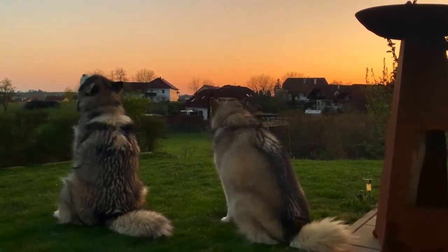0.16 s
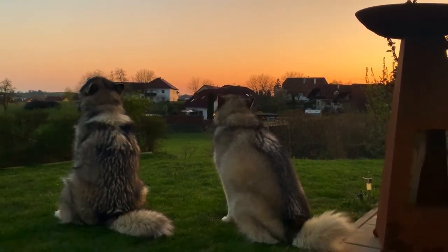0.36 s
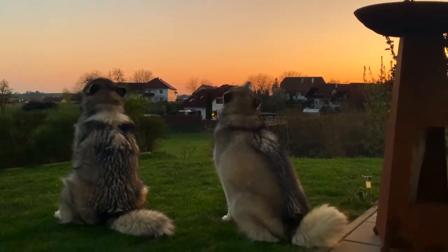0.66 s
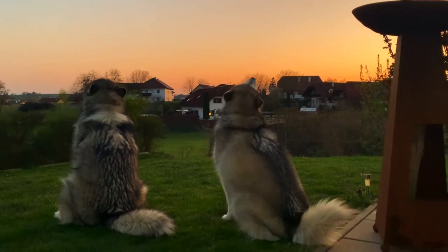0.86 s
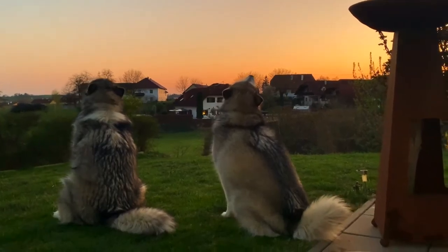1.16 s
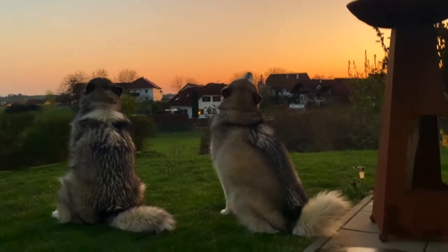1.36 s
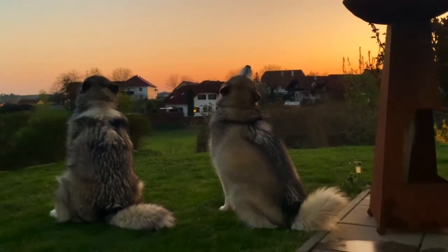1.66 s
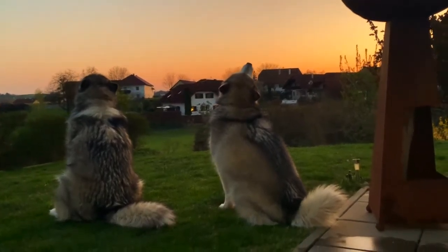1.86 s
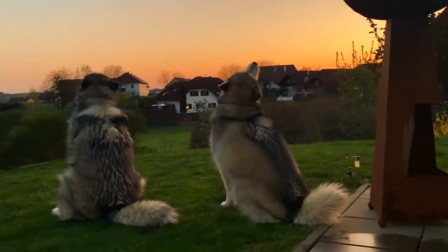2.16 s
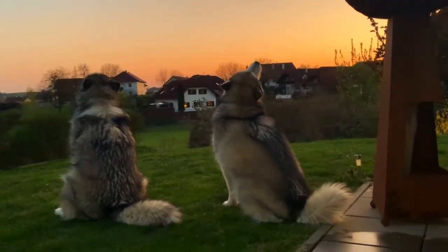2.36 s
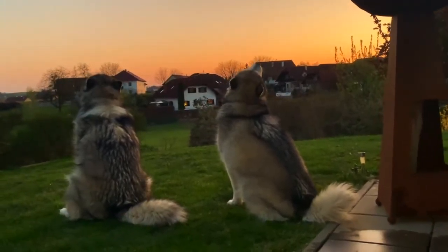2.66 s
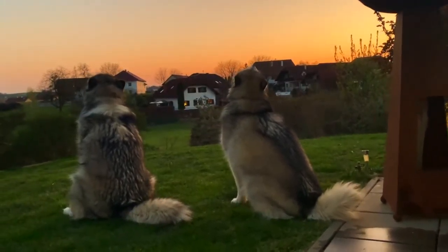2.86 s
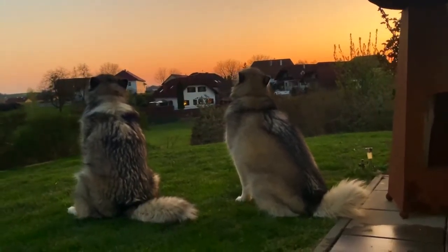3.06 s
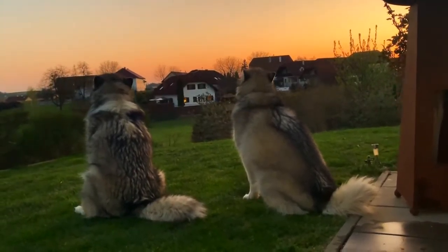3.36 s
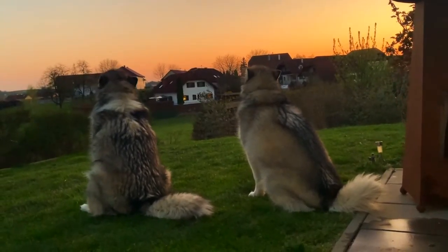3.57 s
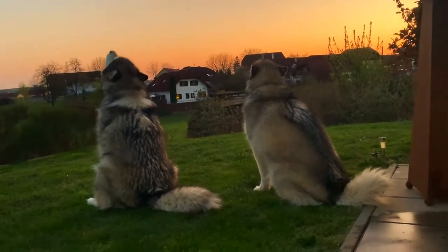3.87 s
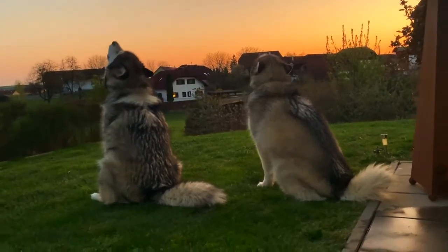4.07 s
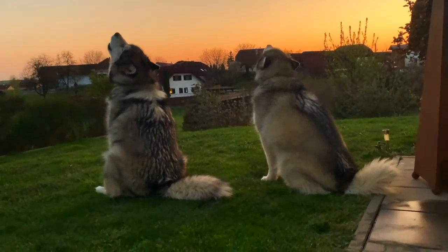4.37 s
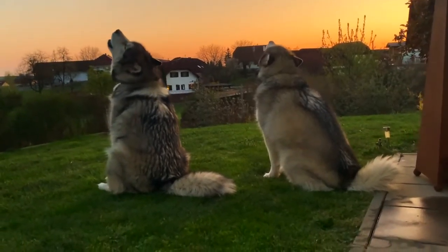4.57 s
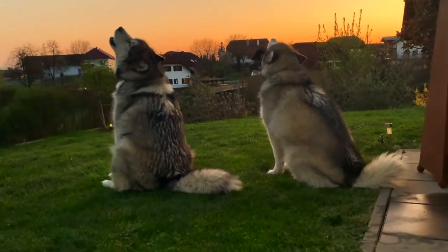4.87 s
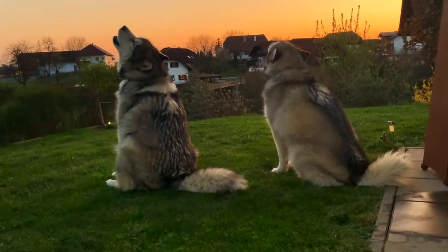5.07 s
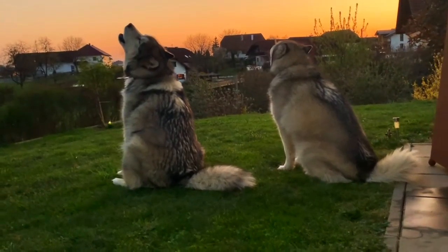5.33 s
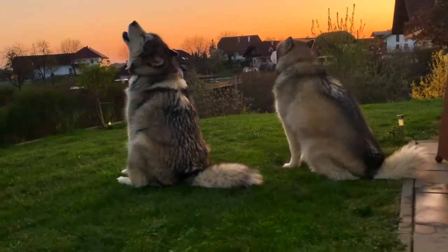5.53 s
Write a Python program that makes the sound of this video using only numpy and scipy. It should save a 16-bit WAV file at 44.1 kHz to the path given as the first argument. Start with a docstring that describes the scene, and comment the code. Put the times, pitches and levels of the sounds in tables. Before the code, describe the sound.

Two large dogs howl together in an open garden, one low and one high, their long sliding calls overlapping and clashing in pitch.

```python
"""Two large dogs howl together in an evening garden, a few metres from a hand-held phone.
The low dog opens with a moan that breaks in pitch, under a thin whistle; the high dog joins with one long slide.
Rustles brush past close by; the low dog howls again from a rough yelp, a soft thud falls, more rustles follow.
Howls are harmonic stacks shaped by mouth and throat, with hoarse flutter and breath noise.
Noise-tail echoes of walls and hedges, a distant noise hum and faint wavering tones lie under it throughout."""
import sys
import numpy as np
from scipy import signal
from scipy.fft import rfft, irfft
from scipy.io import wavfile
from scipy.ndimage import uniform_filter1d

SR = 44100
rng = np.random.default_rng(int(sys.argv[2]) if len(sys.argv) > 2 else 0)


def master(y):
    """Save y as 16-bit WAV."""
    cut = np.clip(np.atleast_2d(y).T, -1, 1)
    pcm = np.round(cut * 32767)  # scale
    wavfile.write(sys.argv[1], SR, pcm.astype(np.int16))


N = 251370
T = np.arange(N) / SR  # s
SIDES = np.array([[1], [-1]])  # left, right

# low dog's howls: start_s, pitch_hz, level_db, mouth_db (second harmonic over fundamental)
LOW_FIRST_HOWL = [(0, 286.4, -25, 8.5), (.09, 277.5, -23.5, 13), (.27, 288.5, -24.5, 10),
                  (.335, 329.9, -17.5, 9.5), (.375, 408, -20, -3), (.47, 443, -22, -10.5),
                  (.52, 340.3, -27, 19), (.62, 370, -15.5, 21), (1.03, 383.7, -18.5, 10.5),
                  (1.29, 379.9, -21.5, 9), (1.45, 388.9, -22, 9), (1.68, 391.7, -22.5, 8.5),
                  (1.98, 404, -26.5, 12), (2.05, 429, -26, 12.5), (2.075, 523.3, -32, 1),
                  (2.25, 518, -30.5, 8.5), (2.47, 488, -33.5, 9.5), (2.58, 485, -40, 7.5)]
LOW_SECOND_HOWL = [(3.47, 242.4, -43.5, -0.5), (3.5, 278.1, -32.5, 4.5), (3.52, 315.7, -25, 2.5),
                   (3.538, 369.6, -13.5, 7), (3.57, 375.3, -9.5, 5), (3.59, 422.7, -16.5, -7),
                   (3.65, 413.3, -23.5, -7.5), (3.672, 368, -18.5, -14.5), (3.692, 356, -14.5, -20.5),
                   (3.74, 348.6, -20, -16), (3.82, 355.3, -16.5, -13.5), (3.925, 355.5, -15.5, -14),
                   (3.96, 386.7, -24.5, 5.5), (4.1, 381.8, -24, 17), (4.43, 380.4, -27, 14.5),
                   (4.55, 372, -23, 6.5), (4.73, 359.9, -22, -5), (5.05, 358.8, -18.5, -5),
                   (5.7, 356.1, -24, -3.5)]
# high dog's howl: start_s, pitch_hz, level_db
HIGH_LONG_HOWL = [(.125, 559, -28), (.16, 563, -32.5), (.205, 722, -18.5), (.35, 701, -8),
                  (.455, 719, -14.5), (.7, 642, -25), (.9, 552, -23), (.96, 497, -24), (1.1, 482, -20),
                  (1.3, 471, -25), (1.5, 498, -22), (1.68, 478, -20.5), (1.92, 475, -21), (2.1, 457, -24),
                  (2.28, 443, -26), (2.55, 430, -15.5), (2.605, 403, -17.5), (2.76, 397, -14.5),
                  (2.92, 403, -16), (2.98, 383.2, -17.5), (3.08, 370, -25), (3.19, 367, -29),
                  (3.335, 369, -26.5), (3.395, 385, -17.5), (3.46, 396, -18), (3.59, 394, -17),
                  (3.68, 419, -18), (3.74, 478, -22.5), (3.8, 507, -15), (3.87, 578, -10.5),
                  (3.93, 602, -9), (4.05, 636, -10.5), (4.2, 591, -10), (4.26, 575, -11.5),
                  (4.37, 567, -13), (4.46, 595, -15), (4.56, 639, -13.5), (4.68, 645, -16),
                  (4.78, 632, -14.5), (4.96, 531, -19), (5.04, 483, -37), (5.125, 472, -24.5),
                  (5.2, 405, -31), (5.32, 378, -33)]
# high dog's mouth, set by pitch: pitch_hz, mouth_db (second harmonic over fundamental)
HIGH_MOUTH_BY_PITCH = [(368, 1), (384, -5.5), (398, -11), (435, -11.5), (452, 13.5), (475, -4.5), (494, 12),
                       (515, -22.5), (555, -12), (575, -23), (635, -21.5), (705, -44)]
# throat colour of the upper overtones and breath: freq_hz, gain_db (relative)
LOW_THROAT_COLOUR = [(1100, 22.5), (1550, -3.5), (1900, -2), (2250, -38.5), (2850, -9.5), (3300, -39),
                     (3800, -35), (4300, -46), (4800, -32), (5500, -46), (9000, -57.5)]
HIGH_THROAT_COLOUR = [(1550, -10.5), (1950, 6.5), (2450, -9), (3000, -9.5), (3500, -20.5), (4100, -26.5),
                      (4700, -43.5), (5300, -35.5), (6000, -16.5), (6500, -9.5), (7000, -35.5),
                      (11500, -57)]
# brightness: start_s, third_db and upper_db (against howl level), press_db (lift above about 2.5 kHz)
LOW_BRIGHTNESS = [(0, -15.5, -16, 3.5), (0.301, -18.5, -20, 6), (.43, -10.5, -31.5, -2),
                  (.52, -31.5, -21.5, -8), (0.701, -27.5, -22, -7.5), (1.3, -24, -29.5, -14.5),
                  (2.001, -24.5, -27.5, -2.5), (2.15, -32, -34.5, -0.5), (2.55, -26.5, -33, -3.5),
                  (3.495, 11, 5.5, -19), (3.525, -5, -10, -20), (3.55, -18.5, -16, -15.5),
                  (3.62, -11.5, -16, -18), (3.69, -38.5, -39, 0.5), (4.1, -34.5, -43.5, 6),
                  (4.802, -49.5, -45, 8.5), (5.3, -45.5, -41.5, 11.5), (5.7, -43, -31.5, 15)]
HIGH_BRIGHTNESS = [(.15, -55, -34, -8), (0.352, -47, -56.5, -6), (.7, -33.5, -50.5, 23),
                   (.97, -39.5, -35.5, 8.5), (1.201, -47, -39, 7), (1.599, -33, -32, -0.5),
                   (2.1, -31.5, -33.5, 7), (2.48, -41.5, -39.5, 4), (2.58, -25, -24.5, -6),
                   (2.701, -19.5, -33.5, -7.5), (3.251, -9, -25, -9), (3.42, -12.5, -30.5, -3),
                   (3.75, -26.5, -30.5, -5.5), (3.929, -19, -39, -14.5), (4.09, -15, -27.5, -20),
                   (4.299, -19, -44.5, -11.5), (4.55, -12.5, -27, -17), (4.72, -26.5, -38.5, -15.5),
                   (4.93, -9.5, -32, -12.5), (5.04, -16.5, -8.5, -10.5), (5.13, -19.5, -19, -13),
                   (5.32, -36.5, -26.5, -15.5)]
# place as the phone moves: start_s, fundamental_pan_db, second_pan_db (left minus right)
LOW_PLACE = [(0, 0.5, 1), (0.648, 11, 4), (1.2, -2.5, 5), (2.3, -15, 2), (3.551, 2.5, 9), (3.8, 8.5, 13),
             (4.101, -17.5, 1), (4.801, -1, 10), (5.199, -3.5, 9), (5.7, -18.5, 6)]
HIGH_PLACE = [(.3, -6, -1.5), (0.999, 3, 3), (2.002, 11, 0), (2.35, -15, 3.5), (2.619, 3, -2.5),
              (2.999, 0.5, 5.5), (3.25, -7.5, 12.5), (3.45, 0.5, 5), (3.801, 6.5, -0.5), (4.9, 4.5, -0.5),
              (5.4, -2.5, 2.5)]
# thin whistle in the opening moan: start_s, freq_hz, level_db (sine peak)
MOAN_WHISTLE = [(0, 5010, -64), (.08, 4640, -79.5), (.27, 4980, -70.5), (.6, 4830, -110)]
# rustles: start_s, length_s, level_db (before swell), treble_slope (1.68 dB per octave each)
RUSTLE_EVENTS = [(2.211, 0.071, -56.5, -6), (2.392, 0.061, -53, -11), (2.42, 0.098, -51, -15.5),
                 (4.972, 0.02, -57.5, -10), (5.002, 0.042, -53.5, -2.5), (5.039, 0.21, -67.5, -10.5),
                 (5.249, 0.024, -52, -19)]
# village hum spectrum: freq_hz, gain_db (per Hz, relative)
VILLAGE_SPECTRUM = [(20, -32.5), (45, -6.5), (75, -3), (130, -4), (220, -3.5), (320, -0.5), (550, -9),
                    (1000, -14.5), (2000, -30), (3500, -42), (6000, -40.5), (8000, -47.5), (15000, -51.5)]
# far-off engine drone: start_s, freq_hz, level_db (sine peak)
ENGINE_DRONE = [(1, 130.9, -63.5), (1.4, 133.2, -49), (2.3, 128, -52), (2.7, 176.1, -50.5),
                (4.3, 173.3, -50.5), (4.7, 156, -54.5)]
# faint tone from further away: start_s, freq_hz, level_db (sine peak)
DISTANT_TONE = [(.7, 319, -43), (2.6, 325.7, -45.5), (3.1, 314, -63.5)]

# roughness: per octave/s of glide; at the start, with its decay; level at which fading adds 0 dB of it
GLIDE_ROUGH_DB, CATCH_ROUGH_DB, CATCH_S, FALTER_DB = -38, -15.5, 0.051, -58.5
START_MOUTH_DB, ROUNDING_S = 1, 0.1  # high dog starts wide, then rounds its mouth
THUD_S, THUD_HZ, THUD_DB, THUD_DECAY_S = 3.668, 94, -27.5, 0.02
VILLAGE_DB = -48.5
TOP_HZ = 15600


def low_dog():
    """Two howls with breaks in pitch, where the folds turn rough; a thin whistle rides on the first."""
    first = howl(LOW_FIRST_HOWL, curves(LOW_FIRST_HOWL)[2], LOW_BRIGHTNESS, LOW_PLACE, LOW_THROAT_COLOUR,
                 held_rough_db=-45.5, lead_ms=0.16, jitter_ratio=0.003, air_db=3.5, fade_s=0.0067)
    second = howl(LOW_SECOND_HOWL, curves(LOW_SECOND_HOWL)[2], LOW_BRIGHTNESS, LOW_PLACE, LOW_THROAT_COLOUR,
                  held_rough_db=-44, lead_ms=-0.19, jitter_ratio=0.0041, air_db=0, fade_s=0.019)
    return first + second + drone(MOAN_WHISTLE, waver_ratio=.002)


def high_dog():
    """One sliding howl; the mouth starts wide, then its opening follows the pitch."""
    pitch_hz = curves(HIGH_LONG_HOWL)[0]
    by_pitch_db = 20 * np.log10(colour(pitch_hz, HIGH_MOUTH_BY_PITCH))
    wide = np.exp(-((T - HIGH_LONG_HOWL[0][0]) / ROUNDING_S) ** 2)
    mouth_db = wide * START_MOUTH_DB + (1 - wide) * by_pitch_db
    return howl(HIGH_LONG_HOWL, mouth_db, HIGH_BRIGHTNESS, HIGH_PLACE, HIGH_THROAT_COLOUR,
                held_rough_db=-46, lead_ms=-0.069, jitter_ratio=.002, air_db=-10.5, fade_s=0.049)


def howl(rows, mouth_db, brightness, place, throat, held_rough_db, lead_ms, jitter_ratio, air_db, fade_s):
    """Folds ring in a harmonic stack; the mouth balances the lowest two, the throat shapes the overtones."""
    pitch_hz, level_db = curves(rows)[:2]
    third_db, upper_db, press_db = curves(brightness)
    start_s, end_s = rows[0][0], rows[-1][0]
    rough = hoarseness(pitch_hz, level_db, start_s, held_rough_db)

    # slight pitch waver; when hoarse, cycles differ in length and strength
    wavering_hz = pitch_hz * (1 + jitter_ratio * flutter(35))
    phase = 2 * np.pi * np.cumsum(wavering_hz) / SR + .45 * rough * flutter(130)
    fade_in = np.clip((T - start_s) / fade_s + .5, 0, 1)
    fade_out = np.clip((end_s - T) / fade_s + 1, 0, 1)
    strength = fade_in * fade_out * undb(level_db) * (1 + 0.63 * rough * flutter(130))

    # mouth: the lowest two share the howl level
    first = 1 / np.hypot(1, undb(mouth_db))
    second = first * undb(mouth_db)
    third = undb(third_db + 3.3 * flutter(4.9))
    low = [first, second, third]
    # throat: upper_db is the joint level of harmonics 4 to 6
    throat_power = sum(colour(k * pitch_hz, throat) ** 2 for k in (4, 5, 6))
    upper = undb(upper_db) / np.sqrt(throat_power)

    pans = [undb(SIDES / 2 * db) for db in curves(place)]
    # sound reaches the nearer microphone port first; positive lead_ms is left
    phase = phase + 2 * np.pi * pitch_hz * SIDES / 2 * lead_ms / 10 ** 3
    voice = np.zeros((2, N))
    for k in range(1, 21):
        if k <= 3:
            size = low[k - 1]
        else:
            press = undb(press_db * np.clip((k * pitch_hz - 2300) / 600, 0, 1))
            size = upper * colour(k * pitch_hz, throat) * press
            # short wavelengths fade in and out as the head moves above the reflecting ground
            size = size * undb(4.5 * flutter(13) - .7)
        pan = pans[k - 1] if k <= 2 else 1
        voice += np.sqrt(2) * size * np.sin(k * phase) * pan
    breath = undb(air_db) * rough * np.hypot(third, upper) * glottal_air(phase, throat)
    return strength * (voice + breath)


def hoarseness(pitch_hz, level_db, start_s, held_db):
    """Held notes are clean; folds turn rough at the start, at pitch breaks and as the voice fades."""
    glide_oct_per_s = uniform_filter1d(np.abs(np.gradient(np.log2(pitch_hz))) * SR, size=1300)
    catch = np.exp(-np.maximum(T - start_s, 0) / CATCH_S)
    falter = undb(FALTER_DB - level_db)
    return undb(held_db) + undb(GLIDE_ROUGH_DB) * glide_oct_per_s + undb(CATCH_ROUGH_DB) * catch + falter


def glottal_air(phase, throat):
    """Throat-coloured noise: air rushes through the glottis once a cycle."""
    def spectrum(f):
        band = f ** 2 / (f ** 2 + 600 ** 2) / (1 + (f / 2500) ** 4)
        return colour(f, throat) * band
    return noise(spectrum) * (1 + 0.23 * np.cos(phase))


def garden(x, wet_db, t60_s, dull_hz):
    """Walls and hedges scatter echoes: decaying, dulled noise tails, different at each port."""
    t = T[:SR]
    onset = np.clip((t - .006) / 0.0079, 0, 1)
    tail = rng.standard_normal((2, SR)) * undb(-60 * t / t60_s) * onset
    tail = tail / np.sqrt(np.sum(tail ** 2) / 2)
    tail = signal.sosfilt(signal.butter(1, dull_hz, fs=SR, output="sos"), tail)
    # each port echoes the other side
    return undb(wet_db) * signal.fftconvolve(x[::-1], tail, axes=1)[:, :N]


def rustles(low_hz, grain_db):
    """Cloth or grass brushes close by: short swells of grainy, wide noise."""
    out = np.zeros((2, N))
    for start_s, length_s, level_db, treble_slope in RUSTLE_EVENTS:
        u = np.clip((T - start_s) / length_s, 0, 1)
        swell = np.sqrt(u) * (1 - u) * 3.2 * undb(grain_db * flutter(200))

        def spectrum(f):
            slope = undb(treble_slope * np.log2(1 + f / low_hz) * 1.68)
            return slope * f ** 3 / (f ** 3 + low_hz ** 3)

        wide_noise = 0.7 * noise(spectrum) + 0.77 * noise(spectrum) * SIDES
        out += undb(level_db) * swell * wide_noise
    return out


def thud():
    """A soft, low bump: a sine and slow noise that die within a few cycles."""
    t = np.maximum(T - THUD_S, 0)
    body = np.sin(2 * np.pi * THUD_HZ * t) + .5 * flutter(155)
    return undb(THUD_DB) * body * (1 - np.exp(-t / 0.0032)) * np.exp(-t / THUD_DECAY_S)


def village(side_db):
    """A steady distant hum of shaped noise, with two faint drones in it."""
    mid, side = (noise(lambda f: colour(f, VILLAGE_SPECTRUM)) for _ in range(2))
    hum = undb(VILLAGE_DB) * (mid + undb(side_db) * side * SIDES)
    return hum + drone(ENGINE_DRONE, waver_ratio=0.0046) + drone(DISTANT_TONE, waver_ratio=.008)


def drone(rows, waver_ratio):
    """A faint sine that wavers in pitch and strength."""
    freq_hz, level_db = curves(rows)
    strength = undb(level_db + 2.7 * flutter(6))
    wavering_hz = freq_hz * (1 + waver_ratio * flutter(13))
    return strength * np.sin(2 * np.pi * np.cumsum(wavering_hz) / SR)


def undb(db):
    """Decibels to gain."""
    return 10 ** (np.asarray(db) / 20)


def unit(x):
    """Scale to an rms of one."""
    return x / np.sqrt(np.mean(x ** 2))


def curves(rows):
    """Table columns after the first, joined by straight lines in time."""
    s, *columns = np.transpose(rows)
    return [np.interp(T, s, c) for c in columns]


def colour(hz, points):
    """Gain at hz from (Hz, dB) points, joined over log frequency."""
    f, db = np.transpose(points)
    return undb(np.interp(np.log(hz + 1), np.log(f), db))


def noise(gain):
    """Noise of unit rms whose spectrum is gain(Hz)."""
    freq_hz = np.arange(N // 2 + 1) * SR / N
    return unit(irfft(rfft(rng.standard_normal(N)) * gain(freq_hz), N))


def flutter(hz):
    """Random wobble of unit rms, mostly slower than hz."""
    return noise(lambda f: 1 / (1 + (f / hz) ** 2))


def scene():
    """Both dogs, their echoes and the garden around them."""
    dogs = low_dog() + high_dog()
    echoes = garden(dogs, wet_db=-12, t60_s=.4, dull_hz=4000)
    return dogs + echoes + rustles(low_hz=2800, grain_db=-4.5) + thud() + village(side_db=-7.5)


def record(dry):
    """The phone clips peaks beyond 0.97 and cuts the top with a steep low-pass."""
    clipped = np.clip(dry, -.97, .97)
    return signal.sosfilt(signal.ellip(8, .2, 70, TOP_HZ, fs=SR, output="sos"), clipped)


dry = scene()
out = record(dry)
master(out)
```